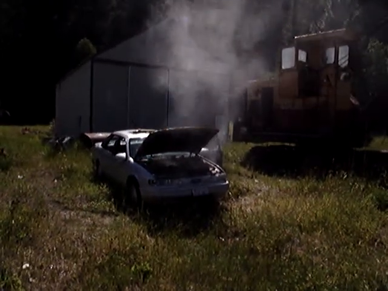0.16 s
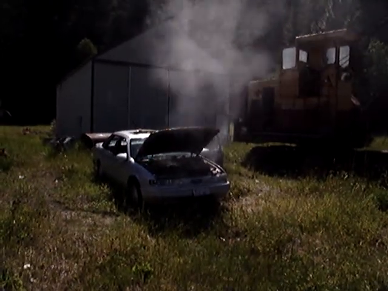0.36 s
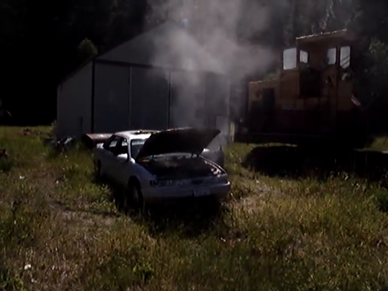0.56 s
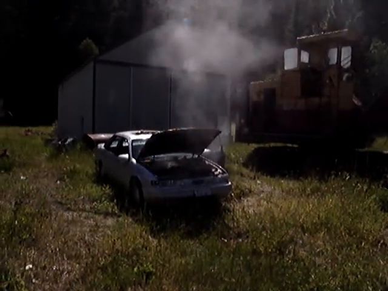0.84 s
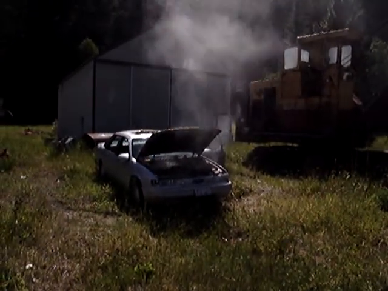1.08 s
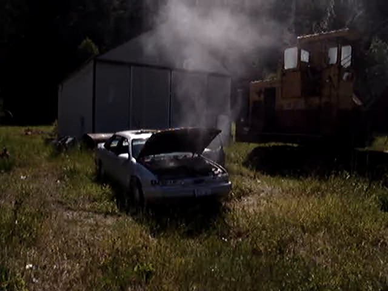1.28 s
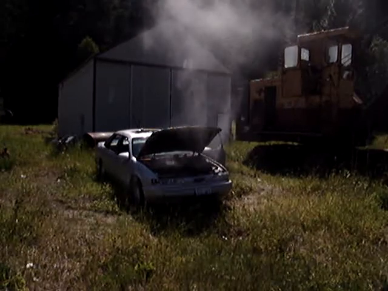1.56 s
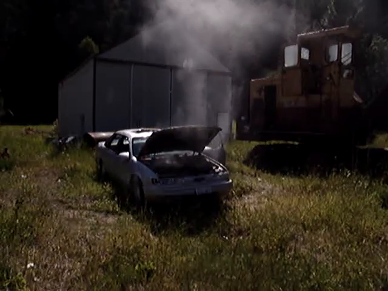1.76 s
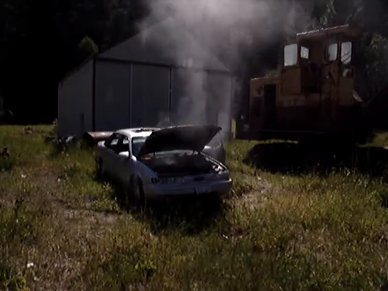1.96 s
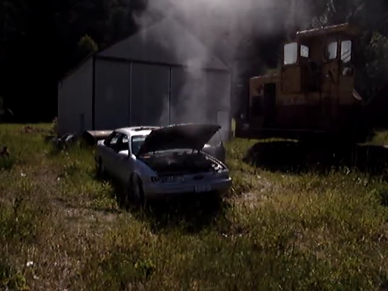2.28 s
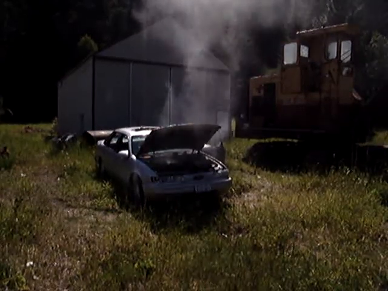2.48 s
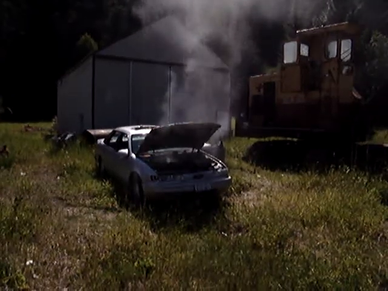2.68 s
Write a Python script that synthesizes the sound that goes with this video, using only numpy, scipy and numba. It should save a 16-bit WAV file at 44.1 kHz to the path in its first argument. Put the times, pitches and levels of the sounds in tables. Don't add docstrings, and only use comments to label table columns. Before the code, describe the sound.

A worn car engine runs with its bonnet open, chugging about twenty-five times a second, with hissing leaks, hard irregular knocks and rattling panels over fan roar; outdoors, some metres from a small, thin-sounding microphone.

```python
import sys
import numpy as np
from scipy import signal
from scipy.fft import rfft, irfft
from scipy.io import wavfile
from scipy.ndimage import uniform_filter1d
from numba import njit

SR = 44100
rng = np.random.default_rng(int(sys.argv[2]) if len(sys.argv) > 2 else 0)


def rack_gain(trim_db):
    fader = np.asarray(trim_db, float)
    return 10 ** (fader / 20)


def store_wav(level_fs):
    pcm = np.round(np.clip(np.atleast_2d(level_fs), -1, 1) * 32767)
    wavfile.write(sys.argv[1], SR, pcm.T.astype(np.int16))


N = 124803

# time_s, cycle_rate_hz
CRANK_SPEED = [
    (0, 12.923),
    (.8, 12.983),
    (2.0, 12.555),
    (2.8, 12.333),
]
# place_cycles, rise_cycles, fall_cycles, hiss_db, clatter_db,
# thud_db
LEAK_BURSTS = [
    (0.0, 0.08, 0.054, -3, -4, -32),
    (0.5125, 0.067, 0.076, -7, -5, 18),
    (0.25, 0.2, 0.054, -21, -14.5, 13.5),
]
# frequency_hz, level_db
HISS_SPECTRUM = [(1500, -39), (2500, 2), (3300, -4.5), (4000, -4.5), (4500, -28.5), (5400, -4.5), (6300, 0),
                 (9900, -9.5)]
# frequency_hz, width_hz, level_db
BLOCK_MODES = [(1780, 270, -5.5), (1930, 210, 0.5), (2187, 220, -2), (2338, 42, 2), (2546, 270, -0.5),
               (2730, 340, 4.5), (2830, 225, 6), (3290, 150, -0.5), (4540, 790, -5)]
# frequency_hz, width_hz, level_db
PANEL_MODES = [(560, 40, -3), (650, 35, -3), (752, 45, 0), (850, 45, -1), (930, 50, -4), (1040, 45, -4),
               (1322, 30, -1), (1445, 50, -1), (1485, 50, 0), (1580, 50, 0), (1640, 50, -1)]
# start_s, level_db, pitch_hz
BEARING_KNOCKS = [(0.0174, -12, 2640), (0.0912, -13, 2430), (0.1316, -10, 2160), (0.1685, -4.5, 2480),
                  (0.2059, -10, 1980), (0.2433, -8, 2280), (0.3227, -5.5, 2820), (0.3601, -17, 2300),
                  (0.3975, -4, 2280), (0.4374, -17, 1930), (0.4743, -9, 2760), (0.5142, -10.5, 2540),
                  (0.5501, -11.5, 1870), (0.5906, -9, 1890), (0.628, 0, 2205), (0.7068, -8.5, 2210),
                  (0.7447, -7, 2500), (0.7831, -5, 2830), (0.821, -4.5, 1810), (0.8589, -6, 2450),
                  (0.8989, -13, 2370), (0.9368, -5.5, 2270), (1.0146, -7, 2760), (1.0904, -9, 1826),
                  (1.1328, -8.5, 1930), (1.1717, -12, 2160), (1.2072, -20, 2600), (1.2446, -10, 2870),
                  (1.3249, -9, 2490), (1.3658, -16, 1880), (1.4431, -9, 1900), (1.4795, -8, 2100),
                  (1.5584, -13, 1950), (1.6367, -14, 1950), (1.6781, -15, 2090), (1.7155, -8.5, 2320),
                  (1.7579, -12, 2830), (1.7943, -16, 2760), (1.8357, -6, 1940), (1.8736, -8.5, 1930),
                  (1.9145, -8, 2120), (1.955, -5, 2220), (2.0328, -6.5, 2770), (2.0747, -9, 2050),
                  (2.1146, -6, 2400), (2.1555, -6, 1920), (2.1949, -9, 2170), (2.2373, -16, 1760),
                  (2.2742, -14, 2820), (2.3161, -8, 2340), (2.3555, -4.5, 2490), (2.3935, -10, 1810),
                  (2.4319, -10, 2150), (2.5152, -11, 1850), (2.5576, -11, 2840), (2.5955, -8.5, 1940),
                  (2.6384, -11, 3160), (2.6773, -13, 2240), (2.7167, -8, 1930), (2.7581, -17, 2230)]
# start_s, level_db, pitch_hz
PANEL_BUMPS = [(0.057, -21, 640), (0.132, -26, 750), (0.67, -14, 724), (0.748, -24, 780), (0.827, -14, 946),
               (1.289, -39, 775), (1.366, -15, 680), (1.579, -15.5, 630), (1.679, -15, 917),
               (1.761, -16, 722), (1.835, -14, 902), (2.483, -15, 920)]
# place_cycles, level_db
CYLINDER_FIRINGS = [
    (-.017, 0),
    (.202, -10),
    (.323, -4),
    (.501, 0),
    (.706, -7),
    (.808, -12),
]
# frequency_hz, width_hz, level_db
EXHAUST_MODES = [(113, 18, -1), (112, 76, -3), (190, 22, -3), (284, 40, -10)]
# place_cycles, level_db
PAN_SLAPS = [
    (.503, 2),
    (0.02, -5),
    (.36, -12),
]
# time_s, force_db
MAIN_SLAP_FORCE = [(0, -2.5), (.2, -3), (.4, -4.5), (.52, 2.5), (.7, -4), (.9, -0.5), (1.15, -1),
                   (1.4, -4.5), (1.6, 2), (1.75, -2), (1.92, 2), (2.05, -1.5), (2.3, -9), (2.55, -2),
                   (2.64, 0), (2.72, -3), (2.83, -2.5)]
# frequency_hz, width_hz, level_db
PAN_MODES = [(287, 175, 1), (363, 50, -11), (564, 31, -4.5), (678, 30, 5), (740, 110, 4), (882, 37, 4.5),
             (1032, 86, -2.5)]
# start_s, end_s, pitch_hz, width_hz, level_db
PANEL_BUZZES = [(0.5, 1.13, 755, 18, -41), (.85, 1.6, 855, 9.8, -37.5), (0.5, .55, 582, 30, -40),
                (1.5, 1.62, 552, 14, -36.5), (2.5, 2.47, 535, 15, -39.5), (2.3, 2.65, 800, 16, -41.5),
                (2, 2.1, 294, 16, -39.5), (2, 2.83, 690, 37, -39), (1, 0.45, 395, 16, -38),
                (3, 2.2, 960, 24, -34.5), (0, 3.3, 1040, 18, -47)]
# time_s, level_db
COVER_SWELLS = [(0, -39), (.2, -46), (.5, -45), (.62, -38), (1.03, -39), (1.13, -48), (1.55, -47),
                (1.7, -36), (1.97, -37), (2.1, -45), (2.45, -41), (2.62, -43), (2.72, -37), (2.83, -36)]
# frequency_hz, level_db
ROAR_SPECTRUM = [(250, -2.5), (520, -2.5), (800, -7), (1100, -1), (1500, 7), (2600, 2.5), (4000, -6),
                 (9000, -40)]
# frequency_hz, level_db
MUTE_THRESHOLD = [(2500, -54.5), (4000, -48.5), (6000, -39), (10000, -45)]


def level(x, db):
    return x * rack_gain(db) / np.sqrt(np.mean(x ** 2))


@njit
def svf(x, hz, width):
    y, band, low = np.empty(len(x)), 0., 0.
    g, k = np.tan(np.pi * hz / SR), width / hz
    for i in range(len(x)):
        v = (band + g * (x[i] - low)) / (1 + g * (g + k))
        band, low, y[i] = 2 * v - band, low + 2 * g * v, k * v
    return y


def ring(x, modes):
    out = 0
    for k, (hz, width, db) in enumerate(modes):
        out = out + (-1) ** k * rack_gain(db) * svf(x, 1. * hz, 1. * width)
    return out


def colour(x, points):
    hz, db = np.array(points).T
    f = np.fft.rfftfreq(len(x), 1 / SR) + 1
    gain = rack_gain(np.interp(np.log(f), np.log(hz), db, left=-60))
    return irfft(rfft(x) * gain, len(x))


def walk(rate):
    k = int(SR / rate)
    held = np.repeat(rng.standard_normal(N // k + 1), k)
    return 0.84 * uniform_filter1d(uniform_filter1d(held, k), k)[:N]


def pulses(cycle, table, scatter_db, jitter):
    out, turns = np.zeros(N + 1), np.arange(-1, int(cycle[-1]) + 2)
    for at, db in table:
        chance = rng.standard_normal((len(turns), 2)).T
        i = np.interp(turns + at + jitter * chance[0], cycle, np.arange(N), left=N, right=N)
        np.add.at(out, i.astype(int), -rack_gain(db + scatter_db * chance[1]))
    return out[:N]


def blows(table, t60_s, rise_s):
    out, t = np.zeros(N), np.arange(int(t60_s * SR)) / SR
    for s, db, hz in table:
        tone = np.sin(2 * np.pi * hz * t) + np.sin(2 * np.pi * 1.12 * hz * t) / 2
        envelope = rack_gain(db - 10 - 60 * t / t60_s) * (1 - np.exp(-t / rise_s))
        i = int(s * SR)
        out[i:i + len(t)] += envelope * tone
    return out


def crank():
    s, hz = np.array(CRANK_SPEED).T
    speed = np.polyval(np.polyfit(s, hz, len(s) - 1), np.arange(N) / SR)
    start_cycle = -.197
    return start_cycle + np.cumsum(speed) / SR


def pressure(cycle, at, rise, fall):
    scatter_db, jitter_cycles = .8, .008
    turn = np.floor(cycle - at + .5).astype(int) + 1
    chance = rng.standard_normal((turn.max() + 1, 2))[turn].T
    u = cycle - at + 1 - turn - jitter_cycles * chance[0]
    shape = np.where(u < 0, np.exp(-(u / rise) ** 2), 1 / np.cosh(u / fall))
    return shape * rack_gain(scatter_db * chance[1])


def leak(cycle):
    clicks_per_s, click_spread_db = 3000, 2.5
    hiss_db, clatter_db, thud_db, panel_hum_db = -25, -26.5, -30.5, 12.5
    shapes = np.array([pressure(cycle, *row[:3]) for row in LEAK_BURSTS])
    hiss, clatter, thud = rack_gain(np.array(LEAK_BURSTS)[:, 3:].T) @ shapes

    draw = rng.random((3, N))
    strength = rack_gain(-click_spread_db * np.log(draw[2] + 1e-9))
    clicks = level((draw[0] < clicks_per_s / SR) * np.sign(draw[1] - .5) * strength, 0)

    gas = colour(hiss * rng.standard_normal(N), HISS_SPECTRUM)
    shake = (thud + rack_gain(panel_hum_db)) * np.roll(clicks, N // 2)
    shake = signal.sosfilt(signal.butter(2, 490, "high", fs=SR, output="sos"), shake)
    block = level(ring(clatter * clicks, BLOCK_MODES), clatter_db)
    panels = level(ring(shake, PANEL_MODES), thud_db)
    return level(gas, hiss_db) + block + panels


def knocks():
    crack_db, crack_t60_s, crack_hz = -1.5, 0.0062, 3200
    crack, t = np.zeros(N), np.arange(SR // 20) / SR
    noises = rng.standard_normal((len(BEARING_KNOCKS), len(t)))
    for (s, db, _), noise in zip(BEARING_KNOCKS, noises):
        part = crack[int(s * SR):][:len(t)]
        part += (rack_gain(db + crack_db - 60 * t / crack_t60_s) * noise)[:len(part)]
    crack = svf(crack, 1. * crack_hz, 1.23 * crack_hz)
    bearing = rack_gain(5.5) * blows(BEARING_KNOCKS, 0.026, 0.00023)
    bumps = rack_gain(10) * blows(PANEL_BUMPS, 0.044, 0.0015)
    return crack + bearing + bumps


def exhaust(cycle):
    pipe = ring(pulses(cycle, CYLINDER_FIRINGS, 1.0, .0012), EXHAUST_MODES)
    force = rack_gain(np.interp(np.arange(N) / SR, *np.array(MAIN_SLAP_FORCE).T))
    slaps = force * pulses(cycle, PAN_SLAPS[:1], 1.2, .002)
    slaps = slaps + pulses(cycle, PAN_SLAPS[1:], 1.2, .002)
    pan = ring(svf(slaps, 504.0, 1400.0), PAN_MODES)
    return level(pipe, -39.5) - level(pan, -37)


def buzzes(cycle):
    fade_s, rough_db = .08, -12
    t, out = np.arange(N) / SR, 0
    shake = level(pulses(cycle, CYLINDER_FIRINGS, 1.7, 0.00049), 0)
    shake = shake + rack_gain(rough_db) * rng.standard_normal(N)
    for start, end, hz, width, db in PANEL_BUZZES:
        gate = np.clip(np.minimum(t - start, end - t) / fade_s + .5, 0, 1)
        out = out + gate * level(svf(shake, 1. * hz, 1. * width), db)
    return out


def cover():
    s, db = np.array(COVER_SWELLS).T
    hz = 466.5 + 3 * walk(20)
    swell = rack_gain(np.interp(np.arange(N) / SR, s, db) - .5 + 2.5 * walk(25))
    return 2 ** .5 * swell * np.sin(2 * np.pi * np.cumsum(hz) / SR)


def roar(cycle):
    dip_db, dip_at_cycles, flicker_db = 3.5, 0.764, 2
    angle = 2 * np.pi * (cycle - dip_at_cycles)
    dip = np.cos(angle) * 0.93 + np.cos(2 * angle)
    db = -dip_db * dip + flicker_db * walk(60) + 0.2 * walk(6.1)
    return level(colour(rack_gain(db) * rng.standard_normal(N), ROAR_SPECTRUM), -25.5)


def shed_echo(car):
    delay_s, echo_db, centre_hz = 0.034, -11.5, 1550
    slap = np.roll(svf(car, 1. * centre_hz, 2. * centre_hz), int(delay_s * SR))
    return rack_gain(echo_db + 0.5) * slap


def scene():
    cycle = crank()
    car = leak(cycle) + knocks() + exhaust(cycle) + buzzes(cycle) + cover() + roar(cycle)
    return (car + shed_echo(car))[None]


def mute(x):
    band_hz, scatter_db, leak_db = 690, 5, -53.5
    f, _, z = signal.stft(x, SR, "cosine", 384)
    band = (f // band_hz).astype(int)
    first_bins = np.unique(band, return_index=True)[1]
    rms = np.sqrt(np.add.reduceat(abs(z) ** 2, first_bins, axis=-2))
    hz, db = np.array(MUTE_THRESHOLD).T
    edge = np.interp((np.arange(rms.shape[1]) + .5) * band_hz, hz, db, left=-200)[:, None]
    ratio = rms / rack_gain(edge + scatter_db * rng.standard_normal(rms.shape))
    keep = ratio ** 20 / (1 + ratio ** 20) + rack_gain(leak_db)
    return signal.istft(z * keep[:, band], SR, "cosine", 384)[1][:, :N]


def low_pass(x):
    return signal.sosfilt(signal.butter(12, 10860, fs=SR, output="sos"), x)


def record(dry):
    clip_at = 0.66
    x = signal.sosfilt(signal.butter(2, 105, "high", fs=SR, output="sos"), dry)
    x = clip_at * np.tanh(x / clip_at)
    x = signal.sosfilt(signal.ellip(12, .5, 95, 10000, fs=SR, output="sos"), x)
    mix = mute(x)
    return low_pass(mix)


dry = scene()
out = record(dry)
store_wav(out)
```